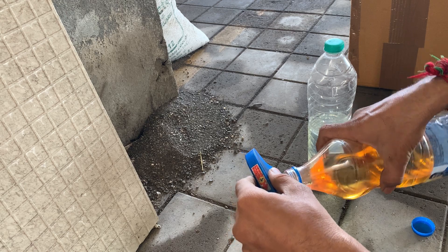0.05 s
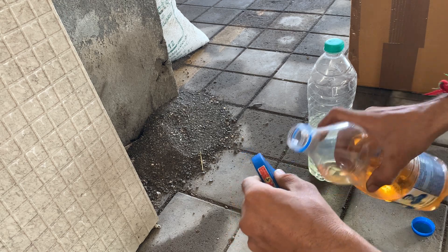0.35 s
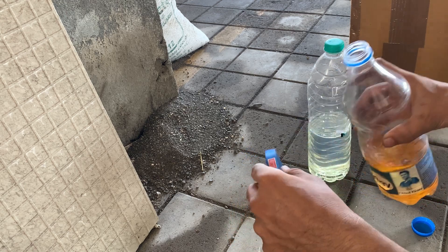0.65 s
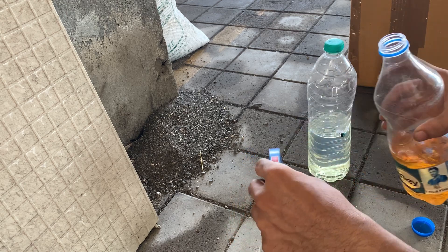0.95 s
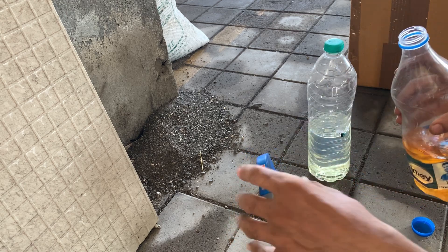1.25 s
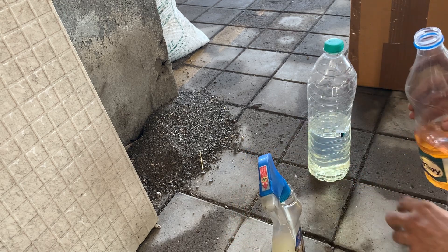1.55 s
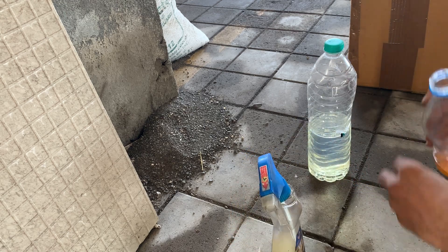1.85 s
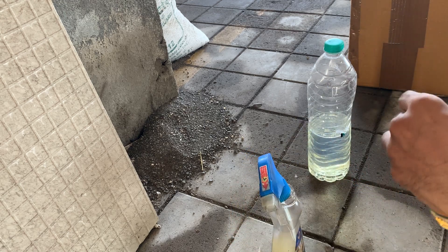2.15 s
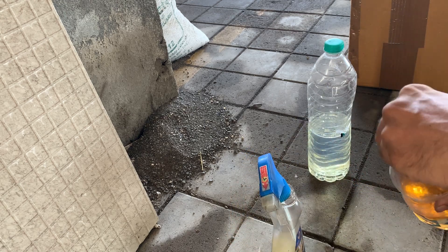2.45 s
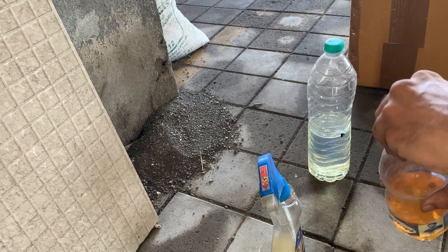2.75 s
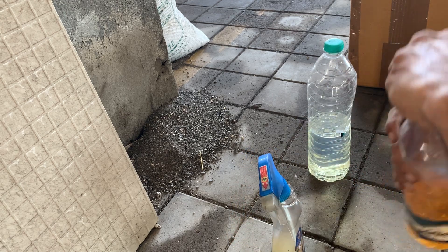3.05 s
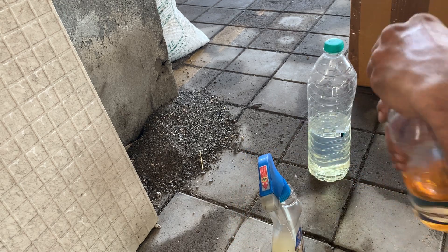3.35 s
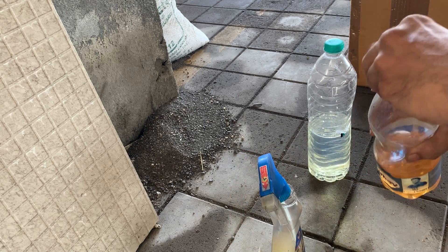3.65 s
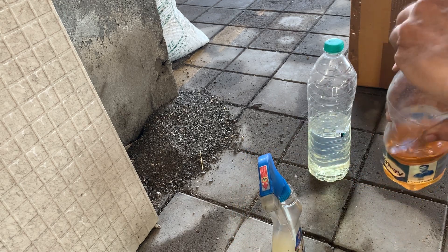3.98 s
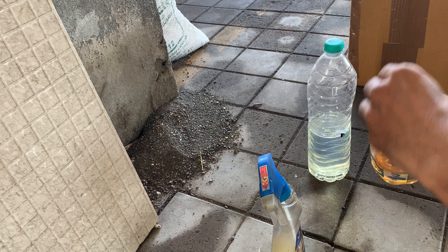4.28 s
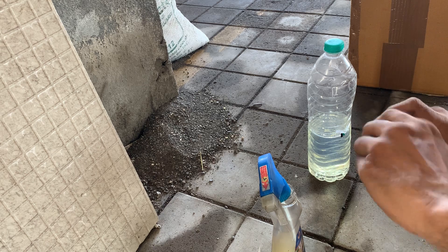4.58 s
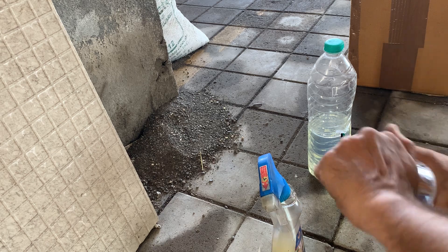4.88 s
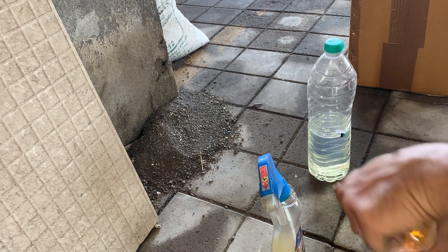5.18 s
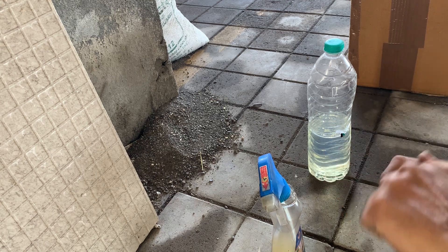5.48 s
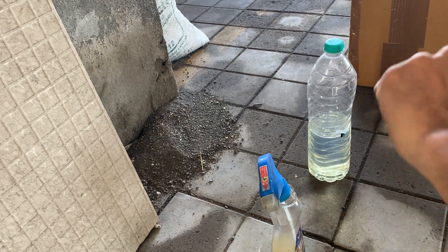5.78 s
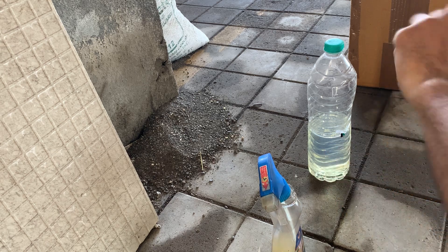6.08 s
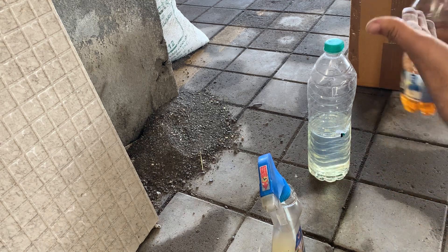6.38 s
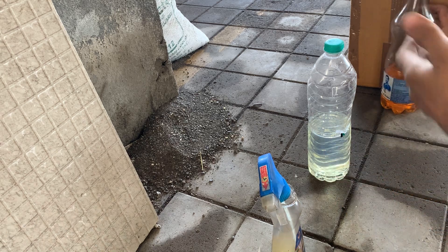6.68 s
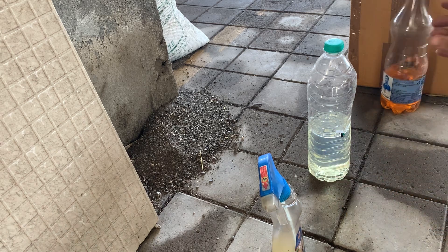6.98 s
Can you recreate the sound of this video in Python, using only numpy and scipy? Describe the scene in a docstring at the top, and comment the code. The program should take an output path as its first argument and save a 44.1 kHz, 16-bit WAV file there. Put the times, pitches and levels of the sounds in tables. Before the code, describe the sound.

Liquid stops pouring and a thin plastic bottle is capped, crinkled and set down on paving while distant birds screech and whistle.

```python
"""On a paved yard, a plastic drink bottle stops pouring into a spray bottle, sloshes upright, is capped
and is set down. Its thin wall buckles and rings under the fingers, palms rub by stick and slip, drops
trap ringing bubbles and the liquid thuds against the soft wall. The houses reflect each click.
Further off, birds screech and whistle over the low rumble of a town."""
import sys
import numpy as np
from scipy import signal
from scipy.fft import rfft, irfft
from scipy.io import wavfile
from scipy.ndimage import uniform_filter1d

SR = 44100
rng = np.random.default_rng(int(sys.argv[2]) if len(sys.argv) > 2 else 0)


def store_wav(level_fs):
    """Save 16-bit WAV to argv[1]."""
    pcm = np.round(np.clip(np.atleast_2d(level_fs), -1, 1) * 32767)
    wavfile.write(sys.argv[1], SR, pcm.T.astype(np.int16))


N = 310023
TIME = np.arange(N) / SR
PORT_LAG_SAMPLES, TOP_HZ = 4, 16300

# spectrum of distant traffic: (frequency [Hz], gain [dB])
TOWN_SPECTRUM = [(20, -25), (40, -7.5), (60, 2.5), (100, -2), (150, -6), (230, -13.5), (380, -12),
                 (600, -18), (1000, -24), (2000, -29.5), (4000, -31), (7000, -42), (11000, -69),
                 (16000, -56.5)]
# air ringing in the bottles: (mid time [s], length [s], frequency [Hz], width [Hz], level [dB])
AIR_RESONANCES = [(0.07, 0.44, 2156, 200, -60.5), (0.103, 0.8, 390, 34.8, -56), (0.79, 1, 389, 44.6, -60.5)]
# drops falling back into the bottle: (time [s], bubble frequency [Hz], level [dB])
DROPS = [(.046, 1430, -51), (.188, 1410, -52), (.597, 1404, -47.5), (.857, 1400, -48), (.975, 1452, -39),
         (1.104, 1436, -46)]
# skin and cap sliding on plastic: (mid time [s], length [s], drag level [dB], hiss level [dB])
STROKES = [(0.062, .015, -56, -52), (.14, 0.096, -58, -64), (.228, .03, -49, -64), (0.492, .027, -55, -49),
           (.778, 0.091, -62, -59), (1.658, 0.029, -66, -46.5), (1.747, 0.031, -70, -61),
           (2.067, 0.039, -51, -47.5), (2.906, 0.12, -53, -54), (3.01, .07, -51, -63),
           (3.132, 0.089, -61, -62.5), (3.374, 0.086, -49, -48.5), (3.504, 0.11, -54, -59),
           (4.832, .11, -45, -43.5), (5.034, 0.11, -47.5, -52.5), (5.184, .05, -49, -54),
           (5.498, 0.22, -51, -53.5), (5.674, 0.083, -41, -38), (6.108, 0.083, -58, -52),
           (6.243, .06, -50.5, -46), (6.97, 0.058, -51, -40.5)]
# snaps of the wall: (time [s], level [dB], pitch [Hz], brightness [dB/octave], hollowness [dB/octave^2])
WALL_SNAPS = [(0.1064, -3.5, 4370, -3, -0.6), (.146, -25, 6500, 1.5, -0.5), (.202, -9, 2800, -1.5, 3.5),
              (0.456, -19, 867, -2, -1), (0.59, -12, 1445, -3.5, 2.5), (.8564, -15.5, 2500, 0, 1.2),
              (0.881, -9.5, 4300, -0.5, -0.7), (0.9736, -7, 1450, -1, 0.6), (1.2408, -13, 1650, -3.5, 0.7),
              (1.639, -24.5, 6400, 4.5, -0.5), (1.648, -28, 5000, 5, -1), (2.0122, 1, 2990, 3, 4.5),
              (2.143, -19, 1500, -0.5, 1), (2.2474, -20.5, 3680, 0.5, 0.5), (2.3486, -16.5, 1790, 1, 2.5),
              (2.476, -20, 2700, 0, 2), (2.55, -5, 1710, -2, 1.5), (2.5595, 0.5, 1550, -2.5, 0.3),
              (2.9583, -2.5, 1700, -1.5, 2), (3.0248, -10.5, 910, -3.5, 2), (4.1314, -8, 1600, -7.5, 5),
              (4.1799, -1.5, 3600, -0.5, 0.6), (4.264, 8.5, 5300, 3.5, -0.7), (4.784, -15.5, 1500, -3.5, 2),
              (4.839, -5, 1220, -2, -.5), (5.1441, -10, 865, -2.5, 2), (5.192, 6, 4030, 0, 0.2),
              (5.4487, 0.8, 3560, 5, 1.9), (5.484, 2.5, 2650, 0.3, 0), (5.6514, 8, 3206, 1.2, 0.7),
              (5.657, 0.5, 1530, 0.5, 1), (5.683, 3, 3600, 1.3, 0.5), (5.727, -5, 2140, -3, 0.5),
              (5.8883, 5, 1926, -1.2, 2.8), (6.0974, -1, 2210, -1.5, 3.5), (6.118, -27, 5200, 3.5, 2),
              (6.15, -20.5, 6240, 1.5, 0), (6.196, -22, 6500, -1, -2), (6.2313, -0.5, 3390, 4.5, 0.5),
              (6.279, -3.5, 1167, 0.5, 1), (6.495, -5.5, 2240, 1.5, 8.5), (6.5614, 11, 2058, 5, 1),
              (6.576, 6, 2070, -0.5, -0.5), (6.888, -10.5, 1140, -7.5, 0.5)]
# modes of a buckling panel: (frequency [multiple of its pitch], level [dB])
PANEL_RATIOS = [(1, 6.5), (.8, 0), (1.27, -3)]
# modes of the whole bottle wall: (frequency [Hz], level [dB])
SHELL_MODES = [(670, -7), (830, -4), (1200, -3.5), (1550, -6), (1780, -10), (2600, -6), (2960, -4),
               (3500, -10.5), (3990, -0.5), (4880, -1.5), (6320, -4), (6740, 0)]
# air gulping through the liquid: (time [s], frequency [Hz], level [dB])
AIR_GULPS = [(.108, 167, -34.5), (.207, 167, -33.5), (.315, 291, -47), (0.604, 365, -39), (1.25, 359, -43)]
# harsh bird calls: (time [s], length [s], fundamental [Hz], level [dB], upper harmonics [dB],
# second harmonic [dB], sag [share of the fundamental])
HARSH_CALLS = [(.835, .18, 1360, -49.5, -5, -14, .14), (1.304, .12, 1300, -53.5, -8, -18, .24),
               (2.395, .11, 1360, -50.5, -6, -18, .14), (3.675, .15, 1350, -51.5, -1, -8, .2),
               (4.571, .1, 1347, -52.5, -7, -8, .12), (4.935, 0.12, 1360, -48, -5, -13, .18),
               (6.325, .15, 1370, -48, -4.5, -11, .18)]
# thin rising notes around the start of some calls: (time [s], pitch [Hz], level [dB], octave [dB])
OPENING_NOTES = [(2.345, 3300, -71, 11), (2.395, 2700, -69, 8), (3.646, 3380, -58, -3.5),
                 (3.657, 2570, -56.5, -1.5), (3.655, 2890, -60, -0.5), (3.755, 2600, -63.5, -10)]
# a dent springing back, then creaking: (time [s], level [dB])
DENT_POPS = [(2.0126, -22.5), (2.026, -31.5), (2.038, -41), (2.086, -39.5)]
# modes of that dent: (frequency [Hz], level [dB], t60 [s])
DENT_MODES = [(1660, -7, .018), (2650, -4.5, .018), (2980, -10, 0.02), (3280, -6, .022), (3540, -7, 0.02)]
# dull knocks of the filled bottle: (time [s], level [dB], hardness [dB/octave])
DULL_KNOCKS = [(2.054, -44, -3), (2.895, -45, 3), (4.841, -40, 1.5), (5.208, -38, 0), (5.765, -41.5, -1.5),
               (6.205, -49, 7.5), (6.587, -23.5, 1), (6.624, -28, 1), (6.889, -40, 5.5)]
# liquid bouncing in the soft bottle: (frequency [Hz], level [dB], t60 [s])
LIQUID_MODES = [(96, -2, 0.11), (146, -6.5, 0.18), (226, -2.5, 0.04), (317, -5, 0.019), (470, -17.5, 0.13)]
# modes of the half-empty bottle: (frequency [Hz], level [dB], t60 [s])
HALF_EMPTY_MODES = [(190, -6, .05), (300, -1, 0.041), (444, -11.5, 0.064), (532, -12, .06),
                    (953, -12, 0.046), (1205, -5, 0.044), (2290, -8.5, 0.03)]
# rising pips of a second bird: (time [s], starting pitch [Hz], level [dB])
RISING_PIPS = [(5.228, 4030, -47.5), (5.545, 3775, -47.5), (5.838, 2473, -49), (6.208, 2510, -48)]
# its falling whistles: (time [s], starting pitch [Hz], level [dB])
FALLING_SLURS = [(5.264, 2900, -46.5), (5.58, 2800, -48.5), (5.955, 3000, -47), (6.341, 3140, -47)]
# the wall rattling as the base meets stone: (frequency [Hz], width [Hz], level [dB], t60 [s])
RATTLE_MODES = [(2160, 650, -1, 0.13), (3030, 210, -10.5, 0.097), (4850, 730, -8, 0.15),
                (6150, 700, -2, 0.11), (10100, 890, -9, 0.09)]
# response of the microphone ports: (frequency [Hz], gain [dB])
PORT_RESPONSE = [(5000, 1), (7000, -0.5), (7900, -9), (8400, -17), (8700, -30), (9000, -9.5), (9500, -6.5),
                 (10400, -1.5), (12000, -9.5), (12900, -11.5), (13450, -29), (14300, -4), (15600, -5.5),
                 (16300, -26.5)]
# left port relative to right port: (frequency [Hz], gain [dB])
LEFT_OVER_RIGHT = [(60, -1), (110, -0.5), (200, -1.0), (380, -1), (700, 1.0), (1290, 1), (2380, 1.5),
                   (4400, -1.5), (8120, 0), (15000, -0.5)]


def undb(db):
    return 10 ** (np.asarray(db) / 20)


def unit(x):
    """Scale to rms 1."""
    return x / np.sqrt(np.mean(x ** 2))


def add(out, s, x):
    """Superposition: mix x into out from time s on."""
    i = max(int(s * SR), 0)
    out[..., i:i + x.shape[-1]] += x[..., :max(N - i, 0)]


def fade(t, t60):
    """Exponential decay, 60 dB down after t60."""
    return np.exp(-np.log(1000) * t / t60)


def colour(x, points, size=4096):
    """Minimum-phase filter through (frequency [Hz], gain [dB]) points, by folding the cepstrum."""
    hz, db = np.transpose(points)
    gain_db = np.interp(np.log(np.arange(size // 2 + 1) * SR / size + 1), np.log(hz), db)
    cepstrum = irfft(np.log(undb(gain_db)))
    cepstrum[1:size // 2] *= 2
    cepstrum[size // 2 + 1:] = 0
    response = irfft(np.exp(rfft(cepstrum)))
    return signal.fftconvolve(x, response[None], axes=1)[:, :x.shape[1]]


def passband(x, hz, kind):
    """Maximally flat filter with skirts of 12 dB per octave."""
    return signal.sosfilt(signal.butter(2, hz, kind, fs=SR, output="sos"), x)


def band(x, hz, width_hz):
    """One resonance, gain 1 at its centre."""
    return signal.lfilter(*signal.iirpeak(hz, hz / width_hz, fs=SR), x)


def pair(count, alike):
    """Partial coherence: two noises whose shared part reaches the right port first."""
    shared, left, right = rng.standard_normal((3, count))
    coherent = np.array([np.roll(shared, PORT_LAG_SAMPLES), shared])
    return np.sqrt(alike) * coherent + np.sqrt(1 - alike) * np.array([left, right])


def resonant_noise(count, hz, width_hz, alike):
    """Random excitation of two equal resonances in series, at rms 1."""
    return unit(band(band(pair(count, alike), hz, width_hz), hz, width_hz))


def walk(rate_hz):
    """Smooth random wander at rms 1."""
    k = int(SR / rate_hz)
    steps = np.repeat(rng.standard_normal(N // k + 1), k)
    return unit(uniform_filter1d(uniform_filter1d(steps, k), k)[:N])


def swell(s, length):
    """Bell-shaped envelope around time s."""
    return np.exp(-(2 * (TIME - s) / length) ** 2)


def whiten(x, bins=80):
    """Whitening: equal energy in every broad band, with the fine peaks kept."""
    spectrum = rfft(x)
    power = uniform_filter1d(np.mean(abs(spectrum) ** 2, axis=0), bins)
    return irfft(spectrum / np.sqrt(power))


def town(level_db=-49.5, wander_db=1.0, flutter_db=1.33, split_hz=450):
    """Diffuse traffic noise: long waves are nearly coherent at the two ports, short ones are not."""
    rumble = passband(pair(N, 0.93), [36, split_hz], "band") * undb(flutter_db * walk(12))
    hiss = passband(pair(N, 0.04), split_hz, "high")
    return undb(level_db + wander_db * walk(1.606)) * unit(colour(rumble + hiss, TOWN_SPECTRUM))


def bottle_air():
    """Cavity resonance: running liquid excites the air in the bottles."""
    return sum(undb(db) * swell(s, length) * resonant_noise(N, hz, width_hz, alike=0.93)
               for s, length, hz, width_hz, db in AIR_RESONANCES)


def bubble(hz, t60, glide):
    """Damped pulsation of trapped air; the note creeps upwards as it dies."""
    t = TIME[:SR // 4]
    return np.sin(2 * np.pi * hz * t * (1 + glide * t)) * fade(t, t60)


def drips(splash_db=-9, small_db=-7, small_count=4, scatter_s=.025):
    """Air entrainment: each drop splashes and traps one main bubble and a few short-lived ones."""
    out, t = np.zeros((2, N)), TIME[:SR // 4]
    for s, hz, db in DROPS:
        splash = resonant_noise(len(t), hz=1700, width_hz=1100, alike=0.55) * fade(t, t60=0.034)
        add(out, s, undb(db) * (bubble(hz, t60=0.05, glide=0.92) + undb(splash_db) * splash))
        for late, pitch in rng.random((small_count, 2)):
            small = bubble(hz * 2 ** (1.4 * pitch - .4), t60=0.017, glide=6)
            add(out, s + scatter_s * late, undb(db + small_db) * small)
    return out


def rubs(slips_per_s=800, scatter_db=2.5, idle_db=-69, hiss=0.34, split_hz=3500):
    """Stick-slip friction on plastic: a firm grip drags dully, a light touch only hisses."""
    drag = sum(undb(db) * swell(s, length) for s, length, db, _ in STROKES)
    touch = sum(undb(db) * swell(s, length) for s, length, _, db in STROKES) + undb(idle_db)
    slipping = rng.random(N) < slips_per_s / SR
    sizes = undb(scatter_db * np.minimum(rng.exponential(size=N), 4))
    slips = slipping * sizes * rng.choice([-1, 1], N)
    wall = whiten(pair(1024, .55) * fade(TIME[:1024], t60=.012))
    grains = unit(signal.fftconvolve(slips[None], wall, axes=1)[:, :N]) + hiss * pair(N, 0.094)
    spectrum = [(150, 6), (600, 2.5), (1500, 3), (3000, 0.5), (6500, -0.5), (10000, 2), (15000, 1.5)]
    friction = unit(colour(grains, spectrum))
    return drag * passband(friction, split_hz, "low") - touch * passband(friction, split_hz, "high")


def crinkles(per_s=60, above_hiss_db=4, scatter_db=4, t60=0.0034, low_hz=3000, high_hz=12000):
    """Damped free vibration: under a rubbing hand tiny creases tick, each at its own pitch."""
    out, t = np.zeros((2, N)), TIME[:SR // 20]
    for s, length, _, hiss_db in STROKES:
        for when, size, pitch in rng.random((int(per_s * length) + 1, 3)):
            tick = np.sin(2 * np.pi * low_hz * (high_hz / low_hz) ** pitch * t) * fade(t, t60)
            db = hiss_db + above_hiss_db + scatter_db * (2 * size - 1.5)
            add(out, s + length * (when - .5), undb(db) * tick)
    return out


def ticks(per_s=3, quiet_db=-31.5, loud_db=-24, low_hz=1400, high_hz=4000):
    """Faint buckling under the fingers at random moments, as rows like those of WALL_SNAPS."""
    return [(when * N / SR, quiet_db + (loud_db - quiet_db) * size,
             low_hz * (high_hz / low_hz) ** pitch, 0, 0)
            for when, size, pitch in rng.random((int(per_s * N / SR), 3))]


def panel(hz, t, t60):
    """One panel mode with gain 1 at its pitch; it radiates to each port with its own phase."""
    decay = fade(t, t60)
    phase = rng.uniform(0, 2 * np.pi) + .5 * rng.standard_normal((2, 1))
    return 2 * np.sin(2 * np.pi * hz * t + phase) * decay / decay.sum()


def snap_spectrum(db, brightness, hollowness, centre_hz=1900, span_octaves=2.25, edge_db=-5):
    """Spectral envelope: a sharper snap tilts it upwards, a rounder dent gathers it in the middle."""
    octaves = np.linspace(-span_octaves, span_octaves, 7)
    arch = db + brightness * octaves - hollowness * octaves ** 2
    return [(100, arch[0] + edge_db), *zip(centre_hz * 2 ** octaves, arch), (TOP_HZ, arch[-1] + edge_db)]


def snaps(buckle_s=0.002, burst_db=-5, crack_s=.0013, crack_db=-10, crackle_db=2.8, after_db=-19.5,
          echo_s=0.021, echo_db=-20, echo_width_s=0.0063, ring_cycles=50, longest_ring_s=.018,
          wall_db=1, wall_scatter_db=3, grip_spread=.015, count=4096):
    """Snap-through buckling: a panel gives way, cracks and rings; the near wall reflects the burst."""
    out, t = np.zeros((2, N)), TIME[:count]
    buckle = t / buckle_s * np.exp(1 - t / buckle_s)
    echo = undb(echo_db) * np.exp(-((t - echo_s) / echo_width_s) ** 2)
    envelope = buckle + undb(after_db) * fade(t, t60=0.17) + echo
    onset = 1 - np.exp(-2 * t / buckle_s)
    crack = undb(crack_db) * np.array([signal.unit_impulse(count, int(crack_s * SR) + lag)
                                       for lag in (PORT_LAG_SAMPLES, 0)])
    for s, db, pitch_hz, brightness, hollowness in WALL_SNAPS + ticks():
        # a quick run of tiny cracks of unequal size
        crackle = undb(crackle_db * np.repeat(rng.standard_normal(count // 16), 16))
        burst = undb(burst_db) * whiten(pair(count, 0.35) * crackle * envelope)
        tension = 1 + grip_spread * rng.standard_normal()  # the grip shifts the wall modes
        ring_s = min(ring_cycles / pitch_hz, longest_ring_s)
        dent = sum(undb(mode_db) * panel(pitch_hz * ratio, t, ring_s / ratio)
                   for ratio, mode_db in PANEL_RATIOS)
        wall = sum(undb(mode_db + wall_db + wall_scatter_db * rng.standard_normal())
                   * panel(hz * tension, t, t60=0.066 / tension) for hz, mode_db in SHELL_MODES)
        snap = crack + burst + (dent + wall) * onset
        add(out, s, colour(snap, snap_spectrum(db, brightness, hollowness)))
    return out


def thud(hz, t60, rise_s=0.0034, rough=0.39):
    """One damped low mode of the liquid; sloshing makes it uneven."""
    t = TIME[:SR // 2]
    slosh = resonant_noise(len(t), hz, width_hz=hz, alike=0.86)
    return (np.sin(2 * np.pi * hz * t) + rough * slosh) * fade(t, t60) * (1 - np.exp(-t / rise_s))


def gulps():
    """Bubble resonance: air gulping through the liquid sounds a low note."""
    out = np.zeros((2, N))
    for s, hz, db in AIR_GULPS:
        add(out, s, undb(db) * thud(hz, t60=0.17))
    return out


def whistle(start_hz, length_s, octaves_per_s, warble, fade_db_per_s=0, overtone=0, flicker_db=4):
    """Frequency modulation: a short note slides and wavers, with or without its octave."""
    count = int(length_s * SR)
    t = TIME[:count]
    pitch = start_hz * 2 ** (octaves_per_s * t) * (1 + warble * walk(900)[:count])
    strength = undb(fade_db_per_s * t + flicker_db * walk(87)[:count]) * signal.windows.tukey(count, .25)
    phase = 2 * np.pi * np.cumsum(pitch) / SR
    return strength * (np.sin(phase) + overtone * np.sin(2 * phase))


def screeches(arch=.04, rasp=.1, lurch=.04, grain_db=3.5, rattle_hz=65, rattle_db=3, fifth_db=-8,
              throat_hz=4050, throat_width_hz=1400, leak=.55):
    """Source and filter: a bird's throat resonance favours the third harmonic of its rattling voice."""
    voice, openers = np.zeros(N), np.zeros(N)
    for s, length, hz, db, upper_db, lower_db, sag in HARSH_CALLS:
        count = int(length * SR)
        progress = np.linspace(0, 1, count)
        tremble = unit(band(rng.standard_normal(count), hz=300, width_hz=250))
        contour = 1 + arch * (np.sin(np.pi * progress) - .75) + sag * (.6 - progress)
        pitch = hz * (contour + rasp * tremble + lurch * walk(110)[:count])
        phase = 2 * np.pi * np.cumsum(pitch) / SR
        second, third, fourth, fifth = (np.sin(k * phase) for k in (2, 3, 4, 5))
        # the outer harmonics peak early, the third late
        outer = undb(lower_db) * second + undb(upper_db) * (fourth + undb(fifth_db) * fifth)
        outer *= (1 - progress / 2) * np.sin(np.pi * progress).clip(0) ** 0.24
        core = third * np.sin(np.pi * progress ** 1.58).clip(0) ** 0.47
        rattle = np.sin(2 * np.pi * np.cumsum(rattle_hz * (1 + 0.42 * walk(60)[:count])) / SR)
        add(voice, s, undb(db + grain_db * walk(122)[:count] + rattle_db * rattle) * (core + outer))
    for s, hz, db, octave_db in OPENING_NOTES:
        note = whistle(hz, length_s=0.041, octaves_per_s=1.6, warble=.05, overtone=undb(octave_db))
        add(openers, s, undb(db) * note)
    return openers + leak * voice + (1 - leak) * band(voice, throat_hz, throat_width_hz)


def ring(modes, rise_s):
    """Modal superposition: struck modes decay freely, each with its own phase at the two ports."""
    t = TIME[:SR // 8]
    phases = rng.uniform(0, 2 * np.pi, (len(modes), 1, 1)) + .5 * rng.standard_normal((len(modes), 2, 1))
    ringing = sum(undb(db) * np.sin(2 * np.pi * hz * t + phase) * fade(t, t60)
                  for (hz, db, t60), phase in zip(modes, phases))
    return ringing * (1 - np.exp(-t / rise_s))


def pops():
    """Elastic recovery: a dent springs back with a hollow tock, then creaks as it settles."""
    out = np.zeros((2, N))
    for s, db in DENT_POPS:
        add(out, s, undb(db) * ring(DENT_MODES, rise_s=0.00054))
    return out


def knocks():
    """Mass on a spring: the liquid bounces on the soft wall; harder knocks favour higher modes."""
    out, lowest_hz = np.zeros((2, N)), LIQUID_MODES[0][0]
    for s, db, hardness in DULL_KNOCKS:
        for hz, mode_db, t60 in LIQUID_MODES:
            add(out, s, undb(db + mode_db + hardness * np.log2(hz / lowest_hz)) * thud(hz, t60))
    return out


def hollow_knock(at_s=5.1925, db=-22.5):
    """Impulse response: a blunt blow sets the whole bottle and its air ringing briefly."""
    out = np.zeros((2, N))
    add(out, at_s, undb(db) * ring(HALF_EMPTY_MODES, rise_s=0.0014))
    return out


def whistles():
    """Gliding tones: a second bird alternates rising pips with hoarse falling slurs."""
    out = np.zeros(N)
    for s, hz, db in FALLING_SLURS:
        slur = whistle(hz, length_s=0.11, octaves_per_s=-4.4, warble=.06, fade_db_per_s=-55)
        add(out, s, undb(db) * slur)
    for s, hz, db in RISING_PIPS:
        add(out, s, undb(db) * whistle(hz, length_s=0.037, octaves_per_s=1.74, warble=.031))
    return out


def set_down(at_s=6.563, db=-24.5):
    """Impact excitation: the ribbed base meets stone; shaking liquid blurs the ring of the wall."""
    out, t = np.zeros((2, N)), TIME[:SR]
    for hz, width_hz, mode_db, t60 in RATTLE_MODES:
        rattle = resonant_noise(SR, hz, width_hz, alike=0.33)
        add(out, at_s, undb(db + mode_db) * rattle * fade(t, t60))
    return out


def yard(x, t60_low, t60_high, gap_s, split_hz=3500, alike=0.13):
    """Reverberation: walls and paving reflect diffusely, and the treble has its own decay."""
    t = TIME[:SR]
    low = passband(pair(SR, alike), split_hz, "low") * fade(t, t60_low)
    high = passband(pair(SR, alike), split_hz, "high") * fade(t, t60_high)
    tail = unit((low + high) * (t > gap_s)) / np.sqrt(SR)
    return signal.fftconvolve(x, tail, axes=1)[:, :N]


def scene(corner_db=-12, houses_db=-14, pan_db=-1.0, screech_db=-4, whistle_db=-5, whistle_send_db=-4):
    """Direct and reverberant fields: bottles close and slightly right, far birds largely reflected."""
    bottles = (snaps() + pops() + hollow_knock() + crinkles() + set_down()
               + gulps() + knocks() + drips() + rubs() + bottle_air())
    near = bottles * undb(np.array([[pan_db], [-pan_db]]) / 2)
    corner = undb(corner_db) * yard(bottles, t60_low=0.15, t60_high=0.066, gap_s=.006)
    houses = undb(houses_db) * yard(bottles, t60_low=0.75, t60_high=0.29, gap_s=0.011)
    harsh, clear = screeches(), whistles()
    birds = undb(screech_db) * harsh + undb(whistle_db) * clear
    sent = harsh + undb(whistle_send_db) * clear
    bird_reverb = yard(np.array([sent, sent]), t60_low=1.0, t60_high=0.72, gap_s=0.006)
    return near + corner + houses + birds + bird_reverb + town()


def record(dry):
    """Frequency response: each port colours the sound in its own way, and the top is cut."""
    heard = colour(dry, PORT_RESPONSE)
    sides = [colour(port[None], [(hz, sign * db / 2) for hz, db in LEFT_OVER_RIGHT])
             for port, sign in zip(heard, (1, -1))]
    return signal.sosfilt(signal.ellip(8, .2, 70, TOP_HZ, fs=SR, output="sos"), np.vstack(sides))


dry = scene()
out = record(dry)
store_wav(out)
```